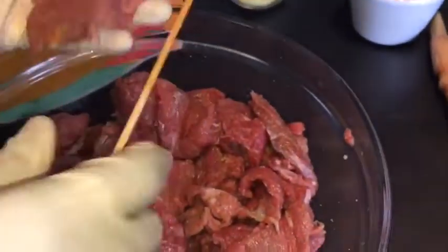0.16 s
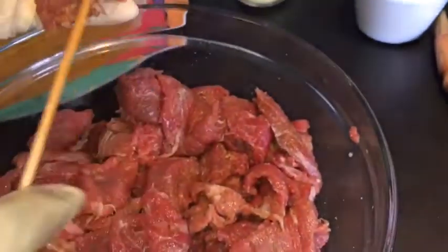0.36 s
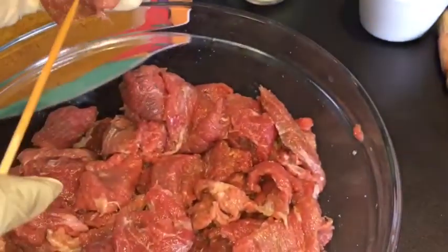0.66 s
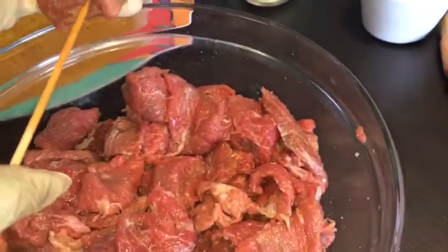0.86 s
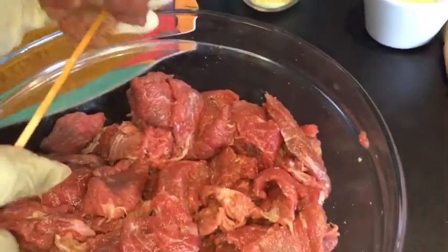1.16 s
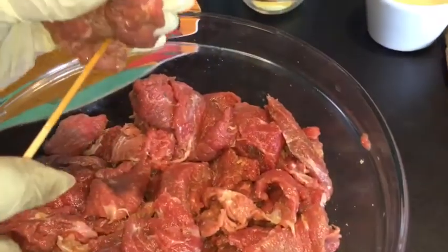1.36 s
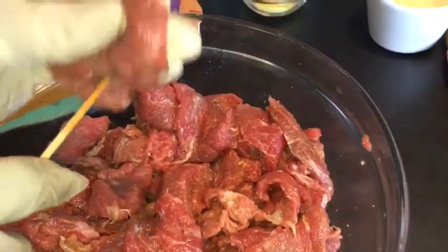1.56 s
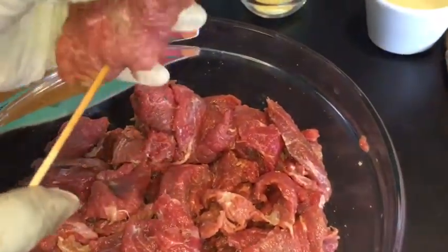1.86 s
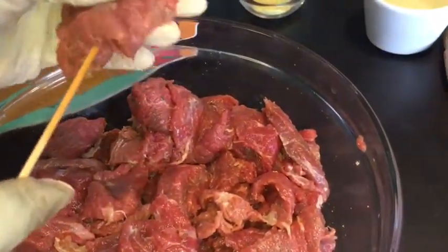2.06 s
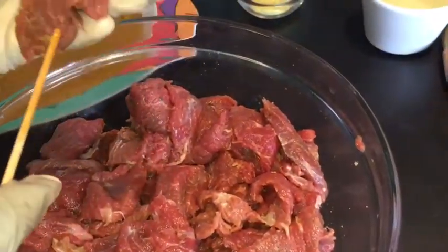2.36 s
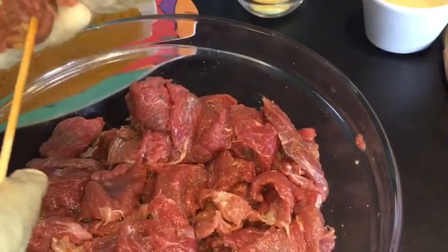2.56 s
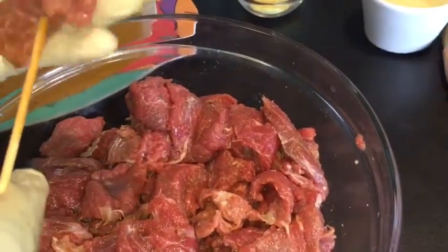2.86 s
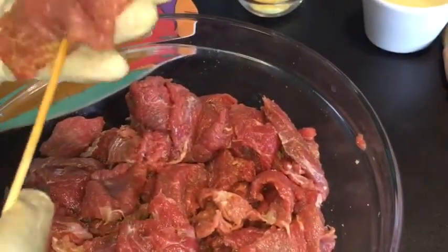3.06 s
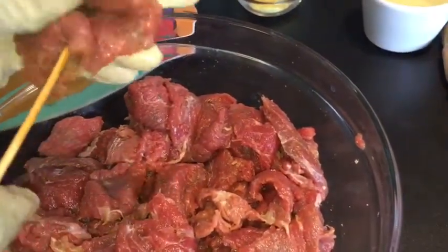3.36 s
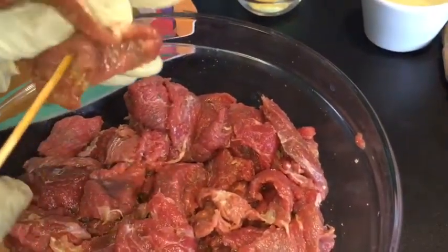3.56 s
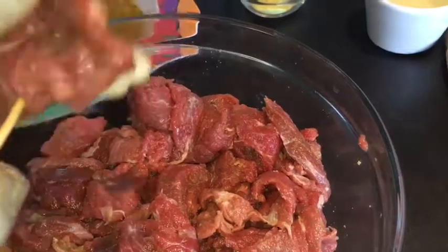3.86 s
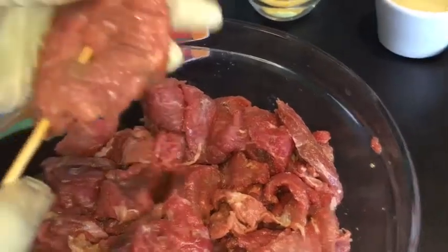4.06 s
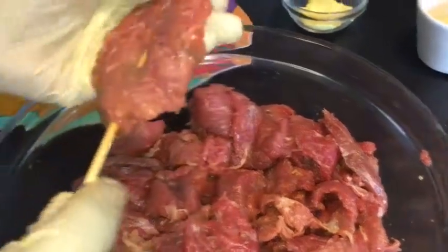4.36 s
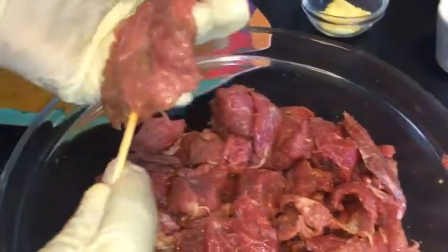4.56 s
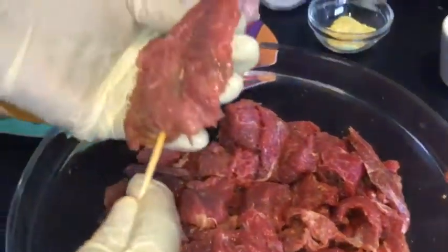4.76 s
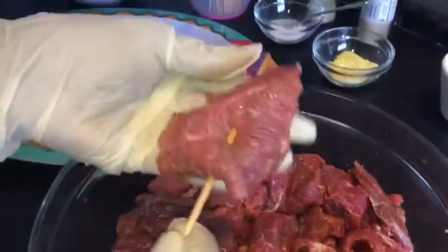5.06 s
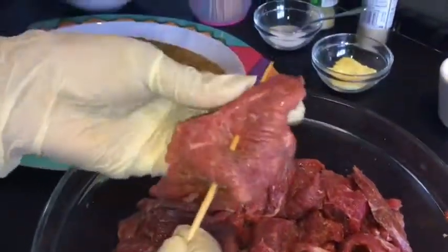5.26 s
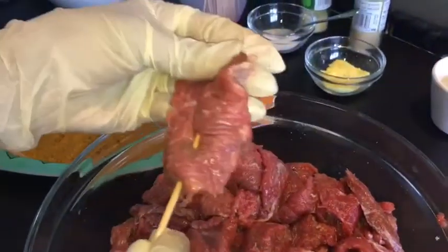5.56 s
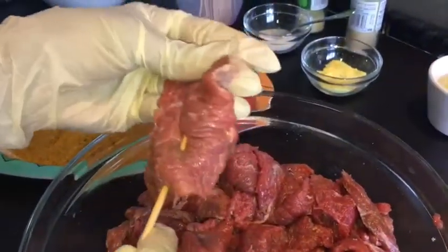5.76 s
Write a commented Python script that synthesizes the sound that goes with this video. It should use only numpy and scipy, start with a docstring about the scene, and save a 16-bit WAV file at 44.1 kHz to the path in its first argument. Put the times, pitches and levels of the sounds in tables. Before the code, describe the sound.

A close microphone in a quiet kitchen picks up gloved hands threading raw meat on a wooden skewer. At the start a few crisp sticky ticks and a soft crackle are heard, with dull low nudges around 0.2-0.3 s, then mostly faint rustle until about 1.4 s. Short wet rubs and clicks follow from 1.4 to 2.2 s, brightest near 1.8 s. From 2.6 s small pops, ticks and stuttering latex drags return, and between 3.2 and 4.6 s the crackling and squishing become dense, with a low moist drag near 4.3 s. At about 4.7 s the glove snaps sharply, bright and ringing, followed by crackle and small wet pops to 5.1 s. Muffled bumps cluster around 5.5 s, and a last tick comes near 5.8 s. Beneath, low hum drifts, strongest around 2.5-2.9 s, over soft hiss and rumble.

```python
"""Gloved hands push slices of raw meat down a wooden skewer, close to the microphone in a quiet kitchen.
Wet latex and meat slide in showers of random grains, crackling and squishing under each push; drags stutter.
Sticky films tick in short noise bursts, wet pockets pop as brief tones, and once a glove snaps and rings.
The skewer takes a few dull, damped nudges; bowl, worktop and walls answer all the handling.
Behind it a low hum swells and fades over room hiss, slight rumble and a thin mains overtone."""
import sys
import numpy as np
from scipy import signal
from scipy.fft import rfft, irfft, next_fast_len
from scipy.io import wavfile
from scipy.ndimage import uniform_filter1d

SR = 44100
rng = np.random.default_rng(int(sys.argv[2]) if len(sys.argv) > 2 else 0)


def unload_wav(signal):
    """Save mono or channel-first audio to the path in sys.argv[1] as 16-bit WAV at rate SR, clipped to [-1, 1]."""
    wavfile.write(
        sys.argv[1],
        SR,
        np.round(np.clip(np.atleast_2d(signal).T, -1, 1) * 32767).astype(np.int16),
    )


N = 261241
TIME = np.arange(N) / SR
TOP_HZ = 16200  # upper limit of the ticks and of the recorder
PADDED = next_fast_len(N)
FREQS = np.fft.rfftfreq(PADDED, 1 / SR)


def undb(db):
    """Decibels to gain."""
    return 10 ** (np.asarray(db) / 20)


def unit(x):
    """Scale to rms 1."""
    return x / np.sqrt(np.mean(x ** 2) + 1e-30)


def curves(table):
    """Each column of a table, joined by straight lines in time."""
    s, *columns = np.transpose(table)
    return [np.interp(TIME, s, c) for c in columns]


def add(out, s, sound):
    """Mix a sound in at time s."""
    i = max(int(s * SR), 0)
    out[i:i + len(sound)] += sound[:len(out) - i]


def decay(t, t60):
    """Exponential die-away, down 60 dB after t60 seconds."""
    return np.exp(-np.log(1000) * t / t60)


def colour(x, points):
    """Filter by a (frequency [Hz], level [dB]) outline; rms 1."""
    hz, db = np.transpose(points)
    outline_db = np.interp(np.log(FREQS + 1), np.log(hz), db)
    return unit(irfft(rfft(x, PADDED) * undb(outline_db), PADDED)[:N])


def splice(sounds, centres):
    """Take from each sound the band around its own centre frequency."""
    spectrum = 0
    for x, share in zip(sounds, np.eye(len(centres))):
        band = np.sqrt(np.interp(FREQS, centres, share))
        spectrum = spectrum + rfft(x, PADDED) * band
    return irfft(spectrum, PADDED)[:N]


def resonate(x, hz, width):
    """One resonance, gain 1 at its centre."""
    b, a = signal.iirpeak(min(hz, SR / 2 - 1), hz / max(width, 1), SR)
    return signal.lfilter(b, a, x)


def walk(rate):
    """Slow random wander of rms 1, from steps drawn at this rate and smoothed twice."""
    k = int(SR / rate)
    steps = np.repeat(rng.standard_normal(N // k + 1), k)
    return unit(uniform_filter1d(uniform_filter1d(steps, k), k)[:N])


def grains(rate, spread_db):
    """Tiny ruptures at random moments, a few much larger than the rest."""
    size = undb(spread_db * np.minimum(rng.exponential(size=N), 5))
    happens = rng.random(N) < rate / SR
    return unit(happens * size * rng.choice([-1, 1], N))


def burst(t60, size=2048):
    """A quickly dying train of micro-slips."""
    slips = rng.choice([-1, 1], size) * (1 + .5 * rng.standard_normal(size))
    return slips * decay(np.arange(size) / SR, t60)


def blow(x, db):
    """Give a short sound the energy of one millisecond at this level."""
    return x * undb(db) * np.sqrt(SR / 1000 / np.sum(x ** 2))


def shifting_hiss(shift_db=1.0, shifts_per_s=4, count=12):
    """Hiss whose colour slowly shifts: each band swells and sinks by itself."""
    centres = np.geomspace(400, 14000, count)
    return splice([rng.standard_normal(N) * undb(shift_db * walk(shifts_per_s)) for _ in centres], centres)


def background(hiss_db=-64, hum_cut_db=-5.0, mains_db=-71.0, rumble_db=-65, uneven_db=2):
    """Room hiss, a low hum of drifting pitch and level, uneven rumble and a thin mains overtone."""
    # Low hum: (time [s], pitch [Hz], level before the cut [dB])
    hum_course = [(0, 49.5, -55.5), (1.1, 47.9, -59.5), (1.45, 51, -49.5), (1.72, 54.1, -63),
                  (1.85, 54.6, -50), (2.5, 54.7, -42), (2.88, 54.57, -42.5), (3.08, 53.1, -58.5),
                  (3.26, 52, -49), (3.42, 49.9, -56), (4.55, 42.2, -52.5), (5.03, 40.7, -65),
                  (5.92, 50, -67)]
    # Colour of the room hiss: (frequency [Hz], relative level [dB])
    room_colour = [(15, -26), (25, -3.5), (61, 6.5), (110, -4), (204, -17.5), (253, -10), (552, -14.5),
                   (1750, -22), (2850, -25), (4870, -32), (5880, -26.5), (7700, -32.5), (9050, -27.5),
                   (12500, -29.5), (15500, -37)]
    rumble_colour = [(28, -21), (48, -1.5), (90, -3.5), (125, -8.0),
                     (160, -0.5), (280, -11), (500, -25.5), (2000, -44)]
    hz, db = curves(hum_course)
    hum = np.sqrt(2) * np.sin(2 * np.pi * np.cumsum(hz) / SR) * undb(db + hum_cut_db)
    mains = np.sqrt(2) * np.sin(2 * np.pi * 200 * TIME) * undb(mains_db + walk(3.83))
    rumble = colour(rng.standard_normal(N), rumble_colour) * undb(rumble_db + uneven_db * walk(12))
    hiss = colour(shifting_hiss(), room_colour) * undb(hiss_db)
    return hum + mains + hiss + rumble


def kitchen(x, early_db=-13, early_t60=0.019, late_db=-23, late_t60=0.55, size=16000):
    """Bowl and worktop answer at once, the walls faintly and later."""
    t = np.arange(size) / SR
    response = np.zeros(size)
    for db, t60, delay in (early_db, early_t60, .002), (late_db, late_t60, .008):
        tail = rng.standard_normal(size) * decay(t, t60) * (t > delay)
        response += undb(db) * tail / np.sqrt(np.sum(tail ** 2))
    return x + signal.fftconvolve(x, response)[:N]


def nudges(rise_cycles=0.27, thud_db=-15, size=6000):
    """Dull low bodies: a tone and a little noise, damped within a few cycles by meat and hand."""
    # Dull nudges of skewer and meat, and the low body of the glove snap:
    # (time [s], envelope peak [dB], pitch [Hz], t60 [s])
    nudge_table = [(0.195, -50.5, 270, 0.049), (.3035, -49.5, 298, 0.064), (.304, -50.5, 590, 0.032),
                   (1.362, -55.5, 551, 0.032), (2.033, -57.5, 610, 0.022), (2.598, -51, 1600, 0.0057),
                   (2.927, -49, 810, 0.0096), (3.237, -50.5, 1060, 0.0076), (3.825, -45.5, 750, 0.003),
                   (4.7222, -39, 1353, 0.0011), (4.747, -52, 575, 0.031), (5.279, -48.5, 298, 0.025),
                   (5.444, -52.5, 403, 0.014), (5.471, -54, 1190, .007), (5.511, -48, 260, 0.051),
                   (5.563, -49.5, 283, 0.041), (5.583, -39.5, 277, 0.047)]
    out, t = np.zeros(N), np.arange(size) / SR
    for s, db, hz, t60 in nudge_table:
        noise = rng.standard_normal(size)
        thud = unit(resonate(resonate(noise, 2 * hz, 2 * hz), 2 * hz, 2 * hz))
        shape = (1 - np.exp(-t * hz / rise_cycles)) * decay(t, t60)
        tone = np.sin(2 * np.pi * hz * t)
        add(out, s, undb(db) * shape / shape.max() * (tone + undb(thud_db) * thud))
    return out


def pops(rise_s=.0008, glide=0.018, click_db=-4, size=2048):
    """A pocket or the catching glove gives a tiny click and rings briefly, rising a little in pitch."""
    # Small wet pockets popping open, and the ring of the glove's first catch:
    # (time [s], ring level over 1 ms [dB], starting pitch [Hz], t60 [s])
    pop_table = [(2.597, -50.5, 2400, 0.019), (3.552, -60, 3060, .005), (3.948, -64, 2350, 0.0057),
                 (4.434, -51, 2830, .008), (4.547, -55, 2595, 0.0061), (4.571, -44, 6840, .014),
                 (4.7225, -36.5, 3100, 0.018), (4.908, -54, 3030, 0.006), (5.022, -48.5, 2900, 0.012),
                 (5.049, -52.5, 2700, 0.0068), (5.237, -57, 2410, 0.0055)]
    out, t = np.zeros(N), np.arange(size) / SR
    for s, db, hz, t60 in pop_table:
        pitch = hz * (1 + glide * np.minimum(t / t60, 1))
        phase = 2 * np.pi * np.cumsum(pitch) / SR
        ring = np.sin(phase) * (1 - np.exp(-t / rise_s)) * decay(t, t60)
        click = resonate(burst(t60 / 2, size), hz, hz)
        add(out, s, blow(ring, db) + blow(click, db + click_db))
    return out


def snaps(slip_db=-24, size=2048):
    """A sharp release rings the stretched glove, with a brief stutter behind it."""
    # The glove catches, lets go and slaps back:
    # (time [s], level over 1 ms [dB], favoured pitch [Hz], emphasis [dB], stutter t60 [s])
    snap_table = [(4.7225, -29.5, 2900, 17, .004), (4.7465, -11.2, 4500, 0, .002),
                  (4.7477, -23, 15000, 5, .002), (4.7492, -22, 15000, 9, .004)]
    # Ring of the taut glove: (frequency [Hz], width [Hz], level before emphasis [dB])
    glove_modes = [(1100, 900, -20), (2480, 500, -8.5), (3070, 220, -10), (4320, 520, 3), (4650, 480, -1),
                   (5170, 350, -1), (6330, 300, -7), (7230, 500, -7), (8570, 200, -9), (9870, 700, -.5),
                   (10800, 300, -5), (13100, 900, -2), (14800, 460, 7), (15500, 350, 5)]
    out = np.zeros(N)
    for s, db, favoured_hz, emphasis_db, t60 in snap_table:
        force = signal.unit_impulse(size) + undb(slip_db) * burst(t60)
        ring = 0
        for hz, width, mode_db in glove_modes:
            # where the glove is struck decides which modes speak most
            near = np.exp(-(np.log2(hz / favoured_hz) * 3) ** 2)
            mode = resonate(resonate(force, hz, width), hz, hz / 5)
            ring = ring + undb(mode_db + emphasis_db * near) * mode
        add(out, s, blow(ring, db))
    return out


def stray_ticks(per_s=6.5, db=-59.5, scatter_db=7, centre_hz=9700, t60=.0018):
    """Faint ticks at random moments, as rows like those of the tick table."""
    chance = rng.uniform(-1, 1, (int(per_s * N / SR), 3))
    return [((when + 1) / 2 * N / SR, db + scatter_db * strength, centre_hz * 2 ** (pitch / 2), t60)
            for when, strength, pitch in chance]


def ticks(ring=0.68, width_hz=3470, skirt_db=-27, size=2048):
    """Each sticky film tears in a short noise burst around its own pitch, over a faint wideband skirt."""
    # Wet films parting: (time [s], level over 1 ms [dB], centre [Hz], t60 before the ring factor [s])
    tick_table = [(0.0404, -38, 9700, 0.0019), (0.0468, -39.5, 10500, 0.0016), (0.0567, -47, 8900, 0.0054),
                  (0.1334, -41, 4930, 0.0039), (0.259, -50.5, 4500, 0.015), (0.3034, -43, 5300, 0.024),
                  (.755, -52, 10500, 0.0012), (0.926, -49.5, 5160, .0034), (1.196, -49.5, 8200, 0.0033),
                  (1.4285, -43, 11100, 0.0062), (1.5553, -46.5, 9300, 0.0054),
                  (1.7185, -48.5, 12550, .0014), (1.8147, -38.5, 8340, 0.0035), (1.8181, -34, 7300, 0.0087),
                  (2.1481, -44, 12140, 0.0015), (2.4432, -46.5, 11400, .002), (2.5702, -41, 12800, 0.0041),
                  (2.772, -50, 12500, .0015), (2.788, -49, 13900, .003), (2.796, -50.5, 12500, .002),
                  (2.801, -56, 6500, .002), (2.885, -45, 4350, 0.0028), (2.903, -50, 9900, .0015),
                  (2.927, -42.5, 7940, 0.0018), (2.943, -50, 9000, .003), (2.951, -50, 7000, .003),
                  (2.961, -47, 10800, 0.0029), (2.965, -53, 11000, .002), (3.12, -49, 6900, 0.0027),
                  (3.126, -49.5, 12500, .002), (3.264, -58, 10500, .002), (3.2843, -42.5, 11840, 0.0022),
                  (3.533, -61, 6040, .003), (3.599, -45, 7000, .005), (3.61, -51, 5930, .004),
                  (3.615, -57, 11000, .002), (3.621, -55, 12000, .002), (3.629, -47, 7500, .003),
                  (3.692, -49.5, 4800, 0.0042), (3.766, -48.5, 4500, 0.0033), (3.737, -30.5, 13200, 0.0008),
                  (3.7475, -41, 12500, .0015), (3.7492, -38, 12540, 0.003), (3.76, -51, 4500, 0.0035),
                  (3.776, -46, 10500, .004), (3.88, -50, 12500, .002), (3.9122, -45, 11140, 0.011),
                  (4.0928, -47.5, 10270, 0.0049), (4.2458, -44, 9750, 0.0031), (4.42, -47, 9300, .004),
                  (4.574, -44, 10050, .008), (4.598, -54, 7200, .003), (4.664, -54, 7170, .004),
                  (4.718, -43, 14000, 0.0052), (4.7736, -36, 13100, .006), (4.777, -33, 13500, .004),
                  (4.7795, -41, 7500, 0.0028), (4.796, -42, 13000, .003), (4.9766, -43.5, 4700, 0.0045),
                  (5.4006, -46.5, 8680, 0.002), (5.46, -39.5, 14200, 0.0027), (5.811, -38.5, 4230, 0.0068),
                  (5.8546, -51, 11600, 0.0023)]
    out, f = np.zeros(N), np.fft.rfftfreq(size, 1 / SR) + 1
    lead = size // 8  # room for the filter to sound ahead of the burst
    for s, db, hz, t60 in tick_table + stray_ticks():
        octaves = width_hz / hz
        band = np.exp(-(np.log2(f / hz) / (2 * octaves)) ** 2) + undb(skirt_db)
        slips = np.roll(burst(t60 * ring), lead)
        tear = irfft(rfft(slips) * band * (f < TOP_HZ))
        add(out, s - lead / SR, blow(tear, db))
    return out


def drags(slip_hz=1300, skew=0.64):
    """Irregular stick-slip through one resonance, swelling quickly and easing off."""
    # Stretches where latex drags and stutters:
    # (start [s], length [s], rms before the swell [dB], resonance [Hz], width [Hz])
    drag_table = [(1.79, 0.044, -59.5, 5900, 620), (2.578, 0.11, -66, 2450, 400),
                  (2.73, 0.2, -67.5, 2880, 500), (2.828, 0.078, -64, 7100, 2200),
                  (2.914, .06, -72, 900, 700), (3.225, 0.035, -72, 1060, 701),
                  (3.541, 0.15, -64.5, 6040, 897), (3.566, 0.092, -62, 1400, 900),
                  (3.782, 0.028, -56, 6650, 700), (3.952, 0.076, -67, 6000, 900),
                  (4.26, 0.13, -54.5, 398, 130), (4.253, 0.12, -58, 5770, 1503),
                  (4.41, 0.14, -66.5, 2720, 400), (5.001, 0.16, -69.5, 2900, 550)]
    out = np.zeros(N)
    for s, length, db, hz, width in drag_table:
        u = np.linspace(0, 1, int(length * SR))
        slips = grains(slip_hz, 0.77)[:len(u)]
        rub = unit(resonate(resonate(slips, hz, width), hz, 3 * width))
        add(out, s, undb(db) * rub * np.sin(np.pi * u ** skew))
    return out


def pressure(attack=0.45, edge_db=8, swell_power=0.86):
    """Crackle and squish gains: every push swells and eases off on top of a light steady rustle."""
    # Pushes of the glove on the meat, before flutter and squish cut:
    # (time of peak [s], length [s], crackle level [dB], squish level [dB])
    stroke_table = [(0.04, 0.1, -55.5, -71), (1.45, 0.049, -61.5, -78), (1.52, 0.26, -66.5, -62.5),
                    (1.615, 0.12, -55, -70), (1.787, 0.13, -59, -81), (1.919, 0.028, -52.5, -64),
                    (2.149, 0.045, -58, -68), (2.6, 0.093, -59.5, -79), (2.77, 0.3, -64.5, -81),
                    (2.934, 0.067, -51.5, -59), (3.23, 0.16, -55, -62.5), (3.423, 0.096, -61, -67.5),
                    (3.56, 0.038, -55, -61), (3.605, 0.041, -50, -54), (3.69, 0.11, -55, -60.5),
                    (3.775, 0.076, -51.5, -63), (3.823, 0.021, -47.5, -65), (3.964, 0.052, -52, -64),
                    (4.29, 0.063, -53, -52.5), (4.364, 0.14, -57.5, -56.5), (4.465, 0.099, -52.5, -71),
                    (4.583, 0.032, -44, -61), (4.726, 0.022, -50, -44), (4.768, 0.047, -40.5, -47.5),
                    (4.868, 0.14, -53, -57.5), (5.004, 0.12, -57, -61.5), (5.117, 0.17, -60, -82),
                    (5.306, 0.039, -54, -78), (5.392, 0.11, -58, -83), (5.48, 0.064, -61.5, -83),
                    (5.727, 0.027, -63, -88)]
    # Light steady rustle between pushes, rising at the end; crackle and squish alike: (time [s], level [dB])
    rustle_course = [(0, -62.5), (.4, -63), (.7, -66), (1.35, -67), (1.6, -75), (2.05, -71), (2.5, -71.5),
                     (3.1, -69), (3.5, -87), (4.05, -64), (4.65, -70.5), (5.2, -69.5), (5.6, -67.5),
                     (5.92, -61.5)]
    rustle_db, = curves(rustle_course)
    crackle, squish = undb(rustle_db) ** 2, undb(rustle_db) ** 2  # summed as power
    for s, length, crackle_db, squish_db in stroke_table:
        near = np.abs(TIME - s) < 2 * length
        u = (TIME[near] - s) / length
        # attack is the share of a push spent building up; it is edge_db down at start and end
        swell_db = -edge_db * np.maximum(-u / attack, u / (1 - attack)) ** swell_power
        crackle[near] += undb(crackle_db + swell_db) ** 2
        squish[near] += undb(squish_db + swell_db) ** 2
    return np.sqrt(crackle), np.sqrt(squish)


def crackling(rate, spread_db, wander_db=2.55, count=4):
    """Films of several sizes burst independently; their shares of the treble wander as the grip shifts."""
    # Colour of the latex crackle: (frequency [Hz], relative level [dB])
    crackle_colour = [(1200, -15), (2200, -3.5), (2900, 1.5), (3700, -0.5), (4300, 0.5), (5000, -3),
                      (6100, 3), (7900, -3.5), (9300, 1.5), (10400, -4), (12000, 3.5), (16000, -1.5)]
    centres = np.linspace(2000, 15000, count)
    films = [grains(rate, spread_db) * undb(wander_db * walk(18)) for _ in centres]
    return colour(splice(films, centres), crackle_colour)


def sliding(rate=1900, spread_db=2.0, flutter_db=2, squish_cut_db=-2):
    """Latex crackles and wet meat squishes under the same uneven push."""
    # Colour of the wet squish: (frequency [Hz], relative level [dB])
    squish_colour = [(200, 7), (500, -2.5), (950, 1), (1700, -1.5), (2800, 2), (3600, -4.5), (6000, -16.5)]
    crackle, squish = pressure()
    push = flutter_db * walk(60)
    fine = crackling(rate, spread_db) * crackle * undb(push)
    soft = colour(grains(rate, spread_db / 2), squish_colour) * squish * undb(squish_cut_db + push)
    return fine + soft


def scene():
    """The hands at work in the kitchen."""
    hands = sliding() + ticks() + pops() + snaps() + nudges() + drags()
    return (kitchen(hands) + background())[None]


def record(dry):
    """The recorder drops the deepest bass and cuts the top."""
    low_cut = signal.butter(4, 33, "high", fs=SR, output="sos")
    top_cut = signal.ellip(10, .2, 70, TOP_HZ, fs=SR, output="sos")
    return signal.sosfilt(top_cut, signal.sosfilt(low_cut, dry))


dry = scene()
out = record(dry)
unload_wav(out)
```